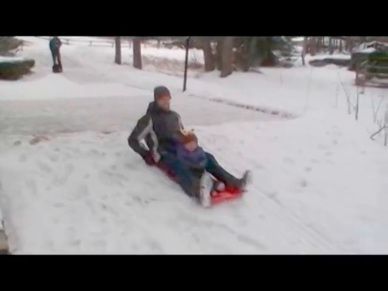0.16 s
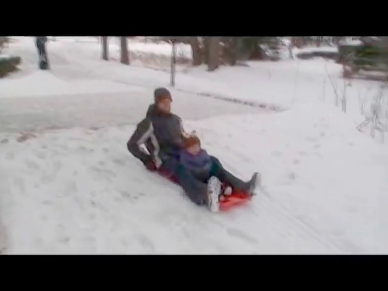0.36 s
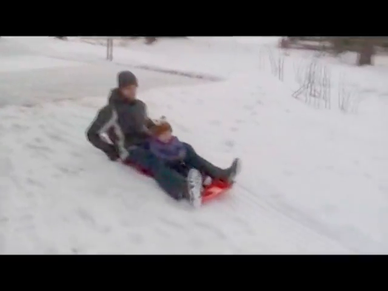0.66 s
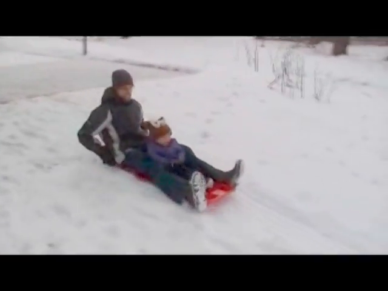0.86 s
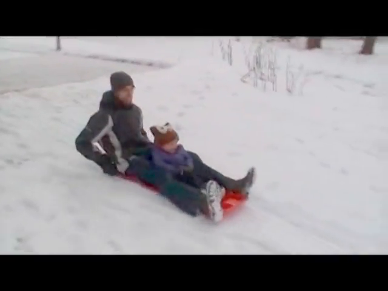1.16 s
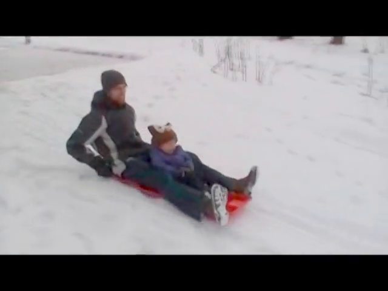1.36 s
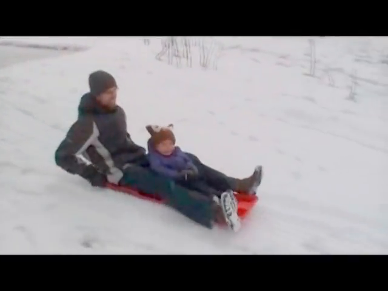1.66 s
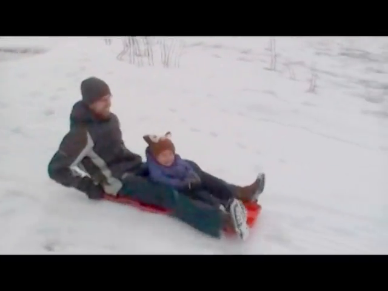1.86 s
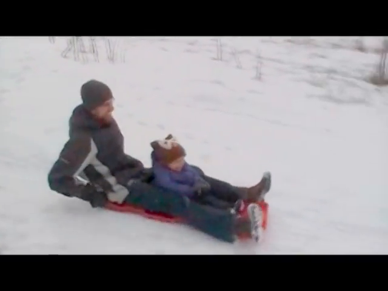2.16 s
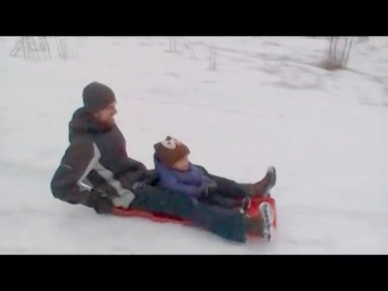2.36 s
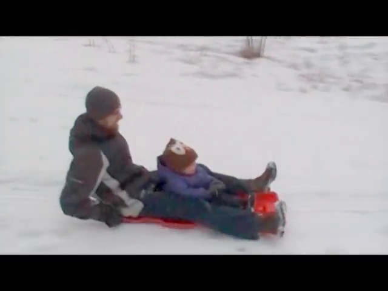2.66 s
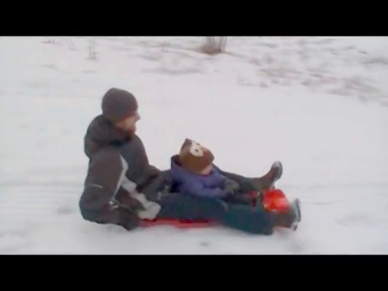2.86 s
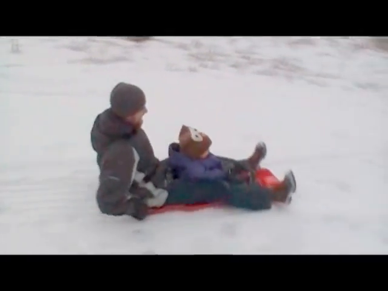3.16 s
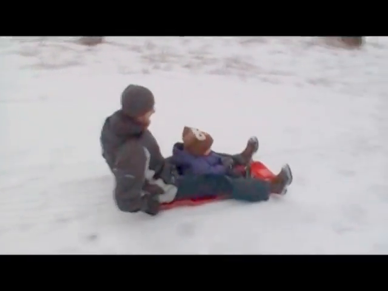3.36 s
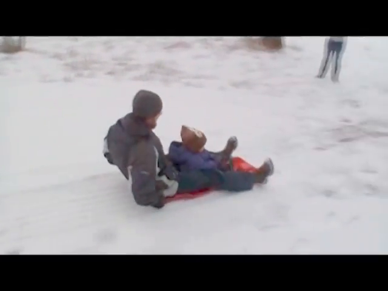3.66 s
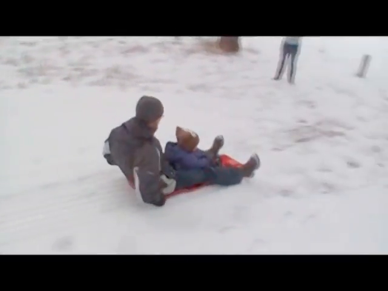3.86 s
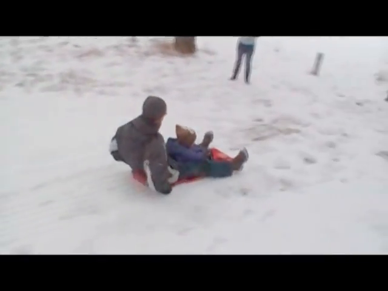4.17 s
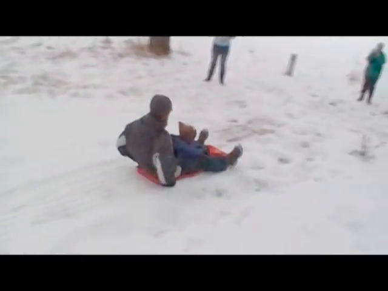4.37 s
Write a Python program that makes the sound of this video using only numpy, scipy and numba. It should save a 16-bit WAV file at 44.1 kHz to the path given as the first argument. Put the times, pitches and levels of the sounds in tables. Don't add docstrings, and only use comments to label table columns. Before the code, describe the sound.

A loaded plastic sled runs over crusty, footprinted snow a few metres from a hand-held microphone outdoors. From the first moment there is a continuous grainy scrape: bright ice-crystal hiss over a hollow, mid-pitched plastic rub. In the first 0.4 s it is softer, with faint high airy squeaks from the rim. Around 0.5 to 0.9 s sharp crust snaps and small knocks appear, and near 1.3 to 1.6 s a cluster of crunches and crackles. From about 1.9 to 2.6 s the scraping is fuller and louder, with a clear crack near 2.3 s. The hardest bumps come at 2.6 to 2.9 s, knocking the shell with brief ringing tones. Low thuds of the riders' weight are strongest around 3.2 to 3.6 s. The rough sliding then continues with scattered crunches, turning hissier by 4.4 s, when a short low wind puff brushes the microphone. It stops mid-slide.

```python
import sys
import numpy as np
from scipy import signal
from scipy.fft import rfft, irfft
from scipy.io import wavfile
from scipy.ndimage import uniform_filter1d
from numba import njit

SR = 44100
rng = np.random.default_rng(int(sys.argv[2]) if len(sys.argv) > 2 else 0)


def makeup_ratio(level_db):
    decades = np.asarray(level_db, float) / 20
    return 10 ** decades


def output_pcm(signal):
    pcm = np.clip(np.atleast_2d(signal).T, -1, 1) * 32767
    wavfile.write(sys.argv[1], SR, np.round(pcm).astype(np.int16))


N = 199773


def track(table, column):
    rows = np.array(table)
    return np.interp(np.arange(N) / SR, rows[:, 0], rows[:, column])


def unit(x):
    return x / np.sqrt(np.mean(x ** 2))


def colour(x, points):
    hz, db = np.transpose(points)
    bins = np.maximum(np.arange(len(x) // 2 + 1) * SR / len(x), 1)
    gain = makeup_ratio(np.interp(np.log(bins), np.log(hz), db))
    return irfft(rfft(x) * gain, len(x))


def lowpass(x, hz):
    return signal.sosfiltfilt(signal.butter(2, hz, fs=SR, output="sos"), x)


@njit
def svf(x, hz, width):
    y, band, low = np.empty(len(x)), 0., 0.
    for i in range(len(x)):
        g, k = np.tan(np.pi * hz[i] / SR), width / hz[i]
        v = (band + g * (x[i] - low)) / (1 + g * (g + k))
        band, low, y[i] = 2 * v - band, low + 2 * g * v, k * v
    return y


def steady_band(x, hz, width):
    return svf(x, np.full(len(x), 1. * hz), 1. * width)


def walk(rate):
    k = max(int(SR / rate), N // 999)
    steps = np.repeat(rng.standard_normal(1000), k)[:N]
    return unit(uniform_filter1d(uniform_filter1d(steps, k), k))


def crystals(scatter_db, smear_s, share):
    snaps = makeup_ratio(scatter_db * np.minimum(rng.exponential(size=N), 8))
    fade = np.exp(-1 / (smear_s * SR))
    power = signal.lfilter([1 - fade], [1, -fade], snaps ** 2)
    return rng.standard_normal(N) * np.sqrt(1 - share + share * power / power.mean())


def patchy(x, edges_hz, patchy_db, rate):
    below = [lowpass(x, hz) for hz in edges_hz]
    bands = np.diff([0 * x, *below, x], axis=0)
    return unit(sum(band * makeup_ratio(patchy_db * walk(rate)) for band in bands))


# [t/s, load on the snow level/dB, iciness (hiss over hull) level/dB,
# nose toward the camera (upper over lower hull) level/dB]
SLIDE = [(0, -32, -10.5, -1), (.17, -32.5, -0.5, 0), (.38, -30.5, 1, 1), (.5, -30, 1.5, 1), (1, -30, 2, 0),
         (1.33, -32.5, -2.5, 0), (1.76, -30, -1, 0.2), (1.93, -25.5, -1, -0.5), (2.57, -26, -0.5, 0.44),
         (2.69, -30.5, -3, 0.5), (2.94, -29, -4, -0.4), (3.29, -28.5, 0.5, 0.5), (3.45, -25.5, -0.5, 0.64),
         (3.7, -30.5, -2.5, 0.6), (3.92, -27, 1.5, 1.3), (4.16, -25.5, -0.5, 1.1), (4.27, -30, -1.5, 1.2),
         (4.45, -30, 7.5, 0.4)]


def glide_db(icy):
    return track(SLIDE, column=1) + icy * track(SLIDE, column=2) / 2


def centre_hz():
    octaves = 0.8 * track(SLIDE, column=3)
    return np.clip(1120 * 2 ** octaves, 500, 2500)


# [t/s, half length/ms, hull level/dB, hiss level/dB], only levels below 0 act
DIPS = [(.11, 12, -2.5, -3), (.19, 12, -2, -1.5), (.335, 12, -1.5, 2), (.41, 10, 0, -1),
        (.615, 12, -4, -0.5), (.795, 22, -3.5, -3), (.925, 9.4, -5.5, -1), (1.155, 27, -5, -2),
        (1.2, 15, -4.5, 1.5), (1.265, 10, 1.5, -3), (1.345, 15, -1, -2), (1.7, 10, -2.5, 0),
        (1.775, 15, -2.5, -1), (2.04, 13, -3.5, -1), (2.19, 12, -2, -2), (2.36, 8.1, -1, -2),
        (2.465, 17, -3, 0), (2.67, 12, -2, 2), (2.722, 6.1, -1, 2), (2.762, 10, 0, -6),
        (2.985, 18, -1.5, -1.5), (3.19, 19, -4.5, 0), (3.635, 10, -2, -2.5), (3.678, 7.5, -5, -1),
        (3.84, 10, 1, -6), (4.22, 9.1, -5, 0), (4.265, 16, -3, 0), (4.38, 10, 3, 0), (3.275, 25, 0, -1),
        (2.89, 15, 0, 0), (3.41, 12, -0.5, 1), (.36, 15, 0, -1), (2.3, 12, -3, -2), (1.54, 5.4, -1, 1)]


def dipped(column):
    ms = np.arange(N) * 1000 / SR
    dip_db = sum(min(row[column], 0) * np.exp(-((ms - 1000 * row[0]) / max(row[1], 3)) ** 4) for row in DIPS)
    return makeup_ratio(dip_db)


# [t/s of greatest load, half length/ms, hull level/dB, hiss level/dB]
HUMPS = [(.02, 39, -37, -32.5), (0.265, 30, -22.5, -24), (0.523, 48, -22, -23.5), (.665, 24, -34, -28),
         (0.863, 10, -26, -25), (1.06, 44, -39, -26.5), (1.225, 10, -31, -23), (1.385, 21, -30, -27),
         (1.43, 34, -50, -38), (1.62, 12, -21, -20), (1.655, 17, -29, -23.5), (1.855, 8.7, -17, -18),
         (1.912, 9.4, -20, -19), (1.972, 12, -22.5, -22), (2.22, 18, -43, -20.5), (2.272, 17, -23, -19),
         (2.624, 22, -31, -21.5), (2.692, 6.7, -27, -22.5), (2.804, 19, -15, -17), (2.853, 25, -26, -19.5),
         (2.935, 21, -29, -22), (3.064, 16, -32, -22.5), (3.135, 14, -30, -20), (3.24, 20, -29, -24),
         (3.325, 15, -23, -20.5), (3.35, 11, -23, -24), (3.385, 11, -35, -19.5), (3.474, 12, -16, -19),
         (3.725, 33, -38, -22), (3.769, 9.3, -17, -18), (3.857, 40, -25, -21.5), (4.023, 20, -37, -20),
         (4.158, 9.3, -32, -20), (4.217, 29, -56, -22), (4.356, 43, -29.5, -20.5), (4.49, 23, -29, -42),
         (.05, 9.3, -35, -33), (.44, 8, -36, -28), (.7, 13, -30, -30), (.768, 8, -33, -27),
         (.882, 8, -35, -26), (.942, 11, -31, -30), (1.46, 7.3, -41, -32), (1.572, 10, -28, -25),
         (1.81, 7.5, -33, -36), (1.95, 8, -30, -25), (2.545, 12, -29, -30), (2.585, 12, -38, -23),
         (3.11, 14, -49, -23), (3.975, 12, -34, -27)]
# [t/s, hull level/dB, hiss level/dB]
LUMPS = [(.314, -32, -24), (0.377, -36, -28), (.655, -27, -37), (0.903, -36, -34), (1.17, -44, -34),
         (1.314, -16, -23), (1.37, -23, -13.5), (1.42, -27, -42), (1.465, -25, -31), (1.494, -54, -28),
         (1.551, -24, -24), (1.719, -29, -32), (2.317, -31, -43), (2.629, -20, -19), (2.705, -12.5, -21.5),
         (2.74, -25, -32), (2.778, -20, -28), (2.865, -35, -30), (3.185, -44, -34), (3.266, -22, -37),
         (3.373, -15, -20), (3.744, -44, -20.5), (3.944, -36, -33), (4.464, -19, -28), (0.084, -36, -30),
         (1.295, -30, -29), (1.478, -44, -29), (2.76, -28, -40), (2.955, -30, -32), (3.308, -26, -24),
         (3.462, -20, -22), (4.339, -35, -23)]
# [t/s, hull level/dB, hiss level/dB, struck pitch f/Hz]
CRUNCHES = [(0.219, -23, -23.5, 880), (.394, -24, -33, 800), (.699, -34, -42, 880), (0.734, -15, -24, 1050),
            (.826, -23.5, -22.5, 820), (1.004, -23, -25, 1480), (1.072, -23, -25, 1490),
            (1.1, -28, -23.5, 865), (1.237, -23.5, -23, 665), (1.291, -20, -32, 800),
            (1.523, -18, -16.5, 1400), (1.588, -21.5, -19.5, 1120), (1.609, -17, -14.5, 1720),
            (1.883, -17.5, -20.5, 766), (2.056, -33, -19.5, 830), (2.184, -18, -30, 1900),
            (2.398, -20, -37, 1100), (2.808, -18, -29, 1100), (3.163, -26, -24, 1710),
            (3.315, -28, -21, 1920), (3.436, -23, -17, 646), (3.503, -21, -19, 1580),
            (3.654, -21, -21, 740), (3.696, -19, -22, 2390), (4.07, -25, -17, 1580),
            (4.127, -26, -21, 1880), (4.425, -17, -25, 550)]
# [t/s, hull level/dB, hiss level/dB, struck pitch f/Hz]
SNAPS = [(0.238, -20, -21, 800), (0.475, -17, -34, 950), (.525, -32, -25, 850), (.583, -15.5, -21, 2400),
         (.608, -36, -21, 1890), (.744, -22, -24, 806), (.821, -17.5, -18.5, 2060), (.893, -15.5, -27, 775),
         (1.056, -22, -25, 2300), (1.391, -17, -17, 1750), (1.405, -21, -17.5, 2150),
         (1.516, -22, -19, 1350), (1.765, -16.5, -50, 784), (1.833, -24, -27, 1420),
         (2.003, -14, -19.5, 1160), (2.082, -25, -20, 1590), (2.118, -26, -19, 830),
         (2.279, -13, -21, 1120), (2.64, -18, -26, 1050), (2.85, -16, -19, 2300), (3.046, -24, -18.5, 1030),
         (3.222, -30, -18.5, 1300), (3.39, -25, -20, 1690), (3.526, -36, -22, 1480), (3.569, -30, -36, 470),
         (3.966, -36, -27, 1480), (4.202, -37, -24, 950), (4.319, -24, -34, 1800), (4.449, -36, -19, 1350),
         (1.29, -18, -30, 900), (.733, -19, -20.5, 1500), (.857, -22, -24, 1100), (1.528, -20, -21, 1500),
         (1.62, -25, -24, 1500), (.497, -24, -25, 1200), (3.441, -18, -18, 700)]


def ridges():
    hz = centre_hz()
    rows = [(s, 1.3 * ms, ms, *levels, hz[int(s * SR)]) for s, ms, *levels in HUMPS]
    rows += [(s, 1.7, 4.2, *levels, hz[int(s * SR)]) for s, *levels in LUMPS]
    rows += [(s, 2.5, 9.7, *rest) for s, *rest in CRUNCHES]
    rows += [(s, 1.44, 2.06, *rest) for s, *rest in SNAPS]
    return np.array(sorted(rows))


def pressure(column, offset_db):
    out, ms = np.zeros(N), np.arange(N) * 1000 / SR
    for row in ridges():
        s, rise_ms, release_ms = row[:3]
        near = slice(max(int((s - .1) * SR), 0), int((s + .1) * SR))
        late = ms[near] - 1000 * s
        u = late / np.where(late < 0, max(0.64 * rise_ms, .5), max(release_ms, 1))
        out[near] += makeup_ratio(2 * (row[column] + offset_db)) * np.exp(-u ** 2)
    return out


# [f/Hz, level/dB]
HISS_TONE = [(2300, -52), (2900, -5), (3800, -0.5), (5500, 1.5), (8100, 2.5), (9500, -2), (11900, -18),
             (13500, -30)]


def pings(count):
    when, pitch, size = rng.random((count, 3)).T
    t = np.arange(500) / SR
    hz = 1800 * 2 ** (2.5 * pitch[:, None])
    fade = t * hz * np.e / 24 * 2
    loudness = makeup_ratio(-4 * np.log(1 - .96 * size[:, None]))
    ring = loudness * fade * np.exp(-fade) * np.sin(2 * np.pi * hz * t)
    place = (when * (N - len(t))).astype(int)[:, None] + np.arange(len(t))
    return unit(colour(np.bincount(place.ravel(), ring.ravel(), N), HISS_TONE))


def hiss(lumps):
    grains = colour(crystals(scatter_db=5.0, smear_s=0.0014, share=0.35), HISS_TONE)
    grains = patchy(grains, [3430, 4540, 6240, 7200, 10100, 9800], patchy_db=2.5, rate=33)
    low = lowpass(grains, 5500)
    grains = low * makeup_ratio(walk(6.58)) + grains - low
    grains = unit(unit(grains) + makeup_ratio(-10.5) * pings(count=2500))
    glide = makeup_ratio(2 * (glide_db(icy=0.47) + 2.5)) * dipped(column=3) ** 2
    load = glide + pressure(column=4, offset_db=-1.0)
    floor = unit(colour(rng.standard_normal(N), [(7000, -36), (9500, 2), (11500, 0), (13500, -4.5)]))
    return grains * np.sqrt(load) * makeup_ratio(0.18 * lumps) + floor * makeup_ratio(-40.0 + walk(10))


# [f/Hz, level/dB]
HULL_TONE = [(300, -36), (430, -3), (640, 1), (1100, 0), (1700, -1), (2500, -3.5), (3000, -6), (4000, -13)]
# [f/Hz, width/Hz, level/dB]
HULL_MODES = [(620, 210, -6.5), (740, 170, -27), (880, 24, -21), (1100, 130, -16), (1200, 120, -25),
              (1690, 79, -14)]


def hull(lumps):
    even = unit(colour(crystals(scatter_db=6.5, smear_s=0.006, share=0.28), HULL_TONE))
    lower = lowpass(even, 1400)
    even = lower + (even - lower) * makeup_ratio(track(SLIDE, column=3))
    rub = patchy(even, [576, 800, 1050, 1420, 1800, 2260], patchy_db=2.5, rate=22)
    body = rub + makeup_ratio(-6.5) * svf(rub, centre_hz() * 2 ** (0.4 * walk(8.1)), 1160.0)
    body = body + sum(makeup_ratio(db - 1.5) * steady_band(rub, hz, width) for hz, width, db in HULL_MODES)
    glide = makeup_ratio(glide_db(icy=-0.81) + 2.5 + 0.21 * lumps) * dipped(column=2)
    bumps = ridges()
    times, pitch_hz = bumps[:, 0], bumps[:, 5]
    struck_hz = pitch_hz[np.searchsorted((times[1:] + times[:-1]) / 2, np.arange(N) / SR)]
    ring = unit(svf(even, struck_hz, 170.0))
    knock = unit(even * makeup_ratio(0.5) + ring * makeup_ratio(-3.5))
    return unit(body) * glide + knock * np.sqrt(pressure(column=3, offset_db=-6.0))


# [f/Hz, level/dB]
RUMBLE_TONE = [(40, -70), (90, -47), (145, -8), (220, -2), (350, -1), (480, -1.5), (700, -76)]
# [t/s, level/dB]
THUDS = [(.08, -43), (.655, -35.5), (.9, -49), (1.32, -38), (1.54, -37.5), (1.88, -33.5), (2.08, -45),
         (2.49, -36), (2.7, -36.5), (2.785, -34.5), (2.955, -43), (3.22, -34), (3.33, -30), (3.43, -28.5),
         (3.57, -33.5), (3.77, -39), (4.02, -34.5), (4.15, -38), (4.33, -36), (4.52, -37.5), (.14, -43),
         (.52, -40), (1.18, -44), (1.44, -41), (2.2, -43), (2.34, -37), (3.85, -40)]


def rumble(lumps):
    ground = unit(colour(crystals(scatter_db=5.5, smear_s=0.0043, share=0.62), RUMBLE_TONE))
    t, thud_s = np.arange(N) / SR, 0.023
    load = track(SLIDE, column=1)
    weight = makeup_ratio(2 * (-42.5 + 0.46 * (load - load.mean())))
    weight = weight + sum(makeup_ratio(2 * db) * np.exp(-((t - s) / thud_s) ** 2) for s, db in THUDS)
    return ground * np.sqrt(weight) * makeup_ratio(0.42 * lumps + 0.99 * walk(11))


# [t/s, half length/s, f/Hz, level/dB]
SQUEAKS = [
    (0.081, .07, 3800, -43),
    (0.24, .045, 3750, -36.5),
    (0.33, 0.037, 3100, -40),
    (0.15, 0.068, 3000, -46),
]


def squeaks():
    t = np.arange(N // 6) / SR
    air, out = rng.standard_normal(len(t)), np.zeros(len(t))
    for s, half, hz, db in SQUEAKS:
        band = unit(steady_band(steady_band(air, hz, 260), hz, 260))
        out += makeup_ratio(db) * band * np.exp(-((t - s) / half) ** 2)
    return np.pad(out, (0, N - len(t)))


def cracks():
    out, t = np.zeros(N), np.arange(400) / SR
    bumps = ridges()
    chance = rng.standard_normal((len(bumps), len(t)))
    for (s, rise_ms, _, hull_db, hiss_db, hz), grit in zip(bumps, chance):
        steep = 1 / (1 + (rise_ms / 2.5) ** 4)
        ring = makeup_ratio(hull_db - 2.0) * np.sin(2 * np.pi * hz * t) * np.exp(-t / 0.0018)
        snap = makeup_ratio(hiss_db + 7.0) * (grit - np.roll(grit, shift=4)) * np.exp(-t / 0.00089)
        i = max(int((s - rise_ms / 1000) * SR), 0)
        out[i:i + len(t)] += steep * (ring + snap)[:N - i]
    return out


# [t/s of greatest ring, f/Hz, level/dB, half length/ms]
RINGS = [(.529, 850, -20.5, 5.6), (.583, 2590, -19, 2.8), (.734, 3800, -18, 3.3), (.746, 778, -20, 7.2),
         (.823, 830, -15.5, 3.6), (.825, 2040, -24, 3), (.02, 1050, -25, 8), (.277, 1150, -24, 6.2),
         (0.473, 999, -19, 3), (.517, 4440, -19, 3), (.584, 3900, -25, 2), (.858, 4530, -26, 3),
         (0.899, 205, -30, 6), (1.17, 520, -26.5, 3.1), (1.293, 944, -22, 4.5), (1.405, 1800, -23, 3.6),
         (1.528, 1495, -26, 4.4), (1.556, 1250, -26, 8.2), (1.89, 2680, -20, 3), (2.002, 2490, -21, 2.7),
         (2.081, 4570, -19, 3), (2.848, 2170, -22, 3.5), (3.47, 1505, -29, 9.1), (3.569, 470, -24, 3.5),
         (4.07, 2000, -24, 3), (4.13, 446, -21.5, 6.5), (1.241, 620, -17.5, 2.4), (1.304, 720, -23.5, 6.6),
         (1.315, 780, -15.5, 3.5), (1.372, 2200, -19, 3), (1.61, 1700, -22, 5.4), (1.93, 629, -24, 19),
         (2.057, 4320, -18, 3), (2.64, 1100, -14, 2.6), (2.706, 4070, -18, 2.6), (2.708, 1850, -20, 3),
         (2.781, 690, -14.5, 7.3), (2.797, 1270, -14, 3.9), (2.814, 1085, -15, 13), (2.841, 1100, -15, 3.3),
         (2.866, 4640, -30, 3), (3.316, 1800, -31, 4), (3.322, 5000, -27, 3), (3.36, 910, -23, 4.6),
         (3.38, 1700, -23, 5.2), (3.774, 650, -21.5, 6.5), (1.296, 640, -20.5, 5), (1.372, 2900, -24, 3),
         (1.03, 2210, -25.5, 5)]


def rings():
    out, t = np.zeros(N), np.arange(N) / SR
    waver = np.cumsum(1 + 0.0153 * walk(90)) / SR
    for s, hz, db, ms in RINGS:
        near = slice(int((s - .06) * SR), int((s + .09) * SR))
        u = (t[near] - s) * 1000 / max(ms, 1)
        swell = np.exp(-(u * np.where(u < 0, 1.4, 1)) ** 2)
        out[near] += makeup_ratio(db) * swell * np.sin(2 * np.pi * hz * waver[near])
    return out * makeup_ratio(1.9 * walk(220))


# [from t/s, to t/s, start f/Hz, end f/Hz]
NOTCHES = [(2.9, 2.99, 2960, 2960), (3.26, 3.34, 2940, 2920), (3.35, 3.43, 2850, 2850),
           (3.43, 3.54, 2930, 2880), (3.46, 3.53, 2860, 2860), (3.48, 3.54, 3260, 3250),
           (3.7, 3.79, 2820, 2860), (3.64, 3.7, 3590, 3590), (3.69, 3.8, 2780, 2880),
           (3.81, 3.89, 3430, 3470), (4.0, 4.1, 3350, 3330), (4.04, 4.13, 2800, 2830),
           (4.2, 4.28, 3290, 3220), (4.06, 4.1, 2970, 2970)]


def cancelled(mid):
    width_hz, fade_s = 100., .012
    for a, b, start_hz, end_hz in NOTCHES:
        near = slice(int((a - .05) * SR), int((b + .05) * SR))
        t = np.arange(N)[near] / SR
        depth = np.clip(np.minimum(t - a, b - t) / fade_s + .5, 0, 1)
        part, hz = mid[near], np.interp(t, [a, b], [start_hz, end_hz])
        for _ in range(2):
            part = part - depth * svf(part, hz, width_hz)
        mid = np.concatenate([mid[:near.start], part, mid[near.stop:]])
    return mid


# [t/s, half length/s, level/dB]
PUFFS = [
    (3.01, 0.023, -61),
    (3.254, .03, -50),
    (3.705, 0.033, -59),
    (4.37, 0.039, -55),
    (4.465, 0.033, -44),
    (4.525, 0.019, -30),
]


def breeze():
    t = np.arange(N) / SR
    tone = [(25, -35), (60, -10), (100, -1), (200, -14), (500, -23), (1200, -41)]
    air = unit(colour(rng.standard_normal(N), tone))
    return air * sum(makeup_ratio(db) * np.exp(-((t - s) / half) ** 2) for s, half, db in PUFFS)


# [f/Hz, level/dB]
WIDTH = [(100, -27), (250, -17), (800, -13.5), (2200, -17.5), (4500, -16), (7500, -18), (10500, -6.5),
         (13000, -23)]


def scattered(mid):
    scatter = rng.standard_normal(300) * np.exp(-np.arange(300) / 80)
    late = np.convolve(mid, scatter / np.linalg.norm(scatter))[:N]
    return colour(late - 0.42 * mid, WIDTH)


def scene():
    lumps = 0.12 * walk(23.0) + 0.18 * walk(45)
    low = hull(lumps) + rumble(lumps)
    pan_db = -3 + 0.9 * np.arange(N) / SR + walk(7.82)
    pan = makeup_ratio(pan_db / 2)
    mid = low + hiss(lumps) + cracks()
    mid = cancelled(mid + rings() + squeaks())
    side = scattered(mid) + makeup_ratio(4.0) * low * (pan - 1 / pan) / 2
    return np.array([mid + side, mid - side])


# [f/Hz, level/dB]
CASING = [(2700, -1), (2900, -4.5), (3100, -2), (7600, -2), (8200, -1), (8800, -1.5)]


def microphone(mid):
    wind_cut = signal.butter(5, 128, "high", fs=SR, output="sos")
    return signal.sosfilt(wind_cut, colour(mid, CASING))


def starved(mid, centres_hz, often):
    for k, hz in enumerate(centres_hz):
        gate = np.clip(3 * (walk(18) + often + 0.36 * k), 0, 1)
        for _ in range(2):
            mid = mid - gate * steady_band(mid, hz, 280)
    return mid


def kept(side, centres_hz, often):
    out = np.zeros(N)
    for hz in centres_hz:
        band = steady_band(steady_band(side, hz, hz / 7.6), hz, hz / 7.6)
        out += band * np.clip(2 * (walk(14) + often), 0, 1)
    return out


# [from t/s, to t/s]
WIDE = [(0.0, 0.007), (0.307, 0.356), (0.472, 0.521), (1.16, 1.209), (1.45, 1.588), (1.754, 1.808),
        (1.889, 1.933), (2.353, 2.402), (2.517, 2.571), (2.692, 2.826), (3.291, 3.374), (3.759, 3.813),
        (3.889, 3.933), (4.019, 4.068), (4.233, 4.282), (4.533, 4.517)]


def folded(side):
    t = np.arange(N) / SR
    apart = uniform_filter1d(sum(1. * (t > a) * (t < b) for a, b in WIDE), size=300)
    narrow = kept(side, [416.0, 550.0, 675.0, 850., 1050., 1160.0], often=-0.12)
    narrow = narrow + kept(side, [2950., 3400., 3750.], often=-1.44)
    wide = signal.sosfiltfilt(signal.butter(2, 90, "high", fs=SR, output="sos"), apart * side)
    return wide + (1 - apart) * narrow * np.interp(t, [2.9, 3.3], [1, 0]) * makeup_ratio(5.0)


def top_cut(both, hz):
    return signal.sosfilt(signal.ellip(12, .3, 85, hz, fs=SR, output="sos"), both)


def band_limit(x):
    return signal.sosfilt(signal.butter(12, 13730, fs=SR, output="sos"), x)


def record(dry):
    t = np.arange(N) / SR
    dry = .9 * np.tanh(dry / .9)
    mid, side = (dry[0] + dry[1]) / 2, (dry[0] - dry[1]) / 2
    top_slices_hz = [11000.0, 11200.0, 11800.0, 12050.0, 12330.0, 12800.0, 12900.0]
    mid = starved(microphone(mid), top_slices_hz, often=np.interp(t, [2.2, 2.8, 4.5], [-2, -1, -2]))
    side = folded(side) + breeze()
    both = np.array([mid + side, mid - side])
    early, late = top_cut(both, 12900), top_cut(both, 12400)
    lowered = np.clip((t - 1.57) / .02 + .5, 0, 1)
    return band_limit(early + lowered * (late - early))


dry = scene()
out = record(dry)
output_pcm(out)
```